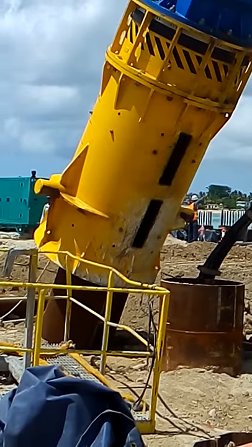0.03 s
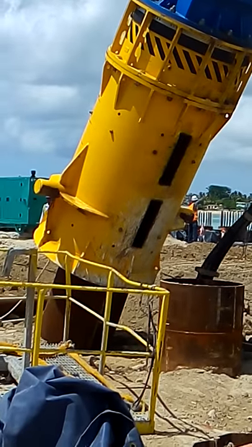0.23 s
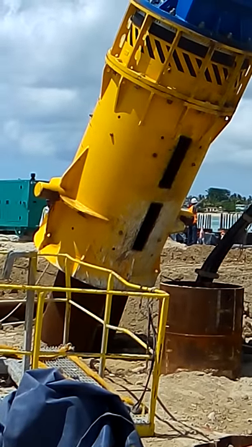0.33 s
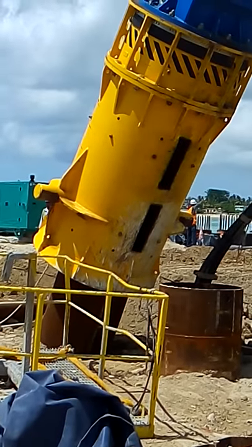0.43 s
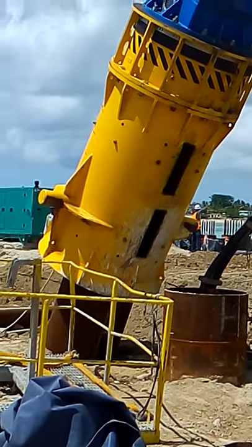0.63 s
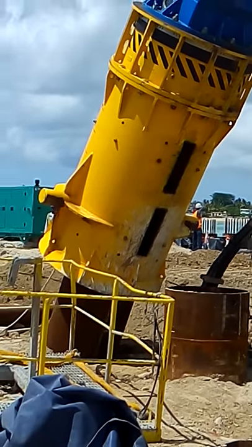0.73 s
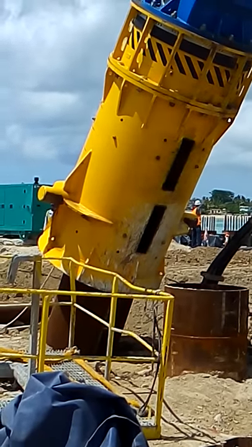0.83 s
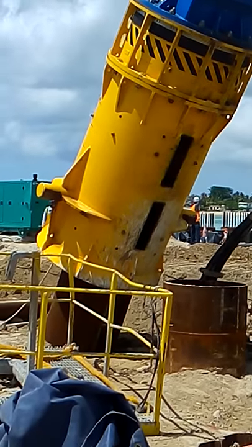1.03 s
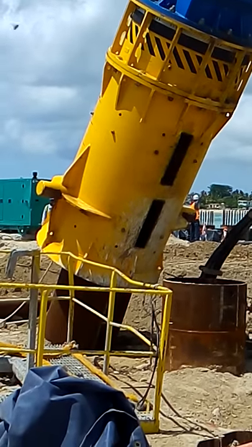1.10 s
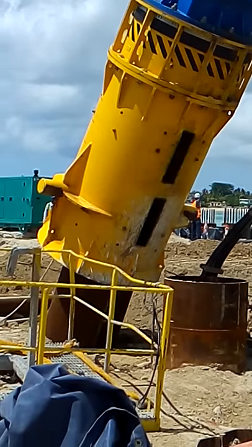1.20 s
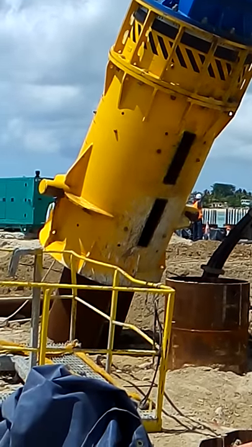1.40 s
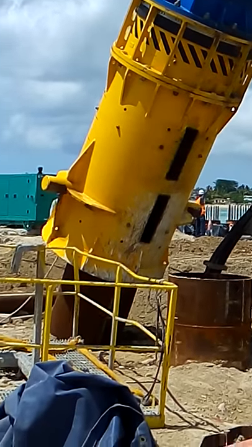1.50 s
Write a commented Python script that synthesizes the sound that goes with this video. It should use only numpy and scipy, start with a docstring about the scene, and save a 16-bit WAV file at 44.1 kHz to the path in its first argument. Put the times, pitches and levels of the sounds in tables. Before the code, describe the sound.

On an outdoor building site, faint machinery runs for a moment before a single loud pile driver blow hits a steel pile. The metal rattles, rings and dies away, treble first, while the hollow machine drone continues.

```python
"""A moment of faint machinery, then a crash: a hydraulic hammer strikes a large steel tube pile once. The
impact excites hammer and pile over a broad band, and the sleeve rattles against the pile. The tube rings, with
a shimmer and a low boom; the level lingers as if limited, then falls treble first. Behind it, on the open
building site, machinery runs, wind over a tube railing sounds a hollow drone that swells and sinks, and two
faint scrapes pass."""
import sys
import numpy as np
from scipy.fft import rfft, irfft, next_fast_len
from scipy.io import wavfile
from scipy.ndimage import map_coordinates

SR = 44100
rng = np.random.default_rng(int(sys.argv[2]) if len(sys.argv) > 2 else 0)


def wav_out(sig):
    """Save sig, one row per channel (or a flat mono array), as 16-bit PCM at SR to the path in sys.argv[1]."""
    wavfile.write(sys.argv[1], SR, np.round(np.clip(np.atleast_2d(sig).T, -1, 1) * 32767).astype(np.int16))


N = 68355
BLOW_S = 0.2132  # the ram lands

# spectral density of the impact: frequency_hz, relative_db
CRASH_SPECTRUM = [(30, -22), (75, -16.5), (115, -5.5), (185, -12), (250, 1), (337, -1), (520, -16.5),
                  (673, 0.5), (952, -3), (1070, -10), (1300, -12.5), (1860, -11.5), (2130, -19.5),
                  (2500, -8.5), (2750, -15.5), (3880, -18), (6440, -19.5), (7400, -18.5), (9000, -21.5)]
# attack by band: frequency_hz, rise_s
CRASH_ATTACK = [(100, .011), (300, 0.0031), (750, 0.019), (2500, 0.0031), (4000, .006), (7000, 0.024)]
# decay by band: frequency_hz, t60_s
CRASH_DECAY = [(60, 0.34), (250, 0.3), (800, 0.24), (2500, 0.27), (7000, 0.15)]
def crash():
    """Impact excitation: the ram's brief force shakes anvil, sleeve and pile over a broad band."""
    def shape(hz):
        return envelope(BLOW_S, rise=along(CRASH_ATTACK, hz), hold=0.028, t60=along(CRASH_DECAY, hz))
    return amp(-10) * by_band(noise(CRASH_SPECTRUM), shape)


# the pile's strongest modes: pitch_hz, level_db, early_t60_s
PILE_MODES = [(149, -31, 2.85), (229, -27, 1.44), (259, -24, 1.2), (305.7, -27.5, 1.9),
              (335.6, -22.5, 1.37), (442, -32, 1.17), (652, -29.5, 0.57), (693, -28.5, 0.66),
              (810, -23.5, 0.83), (877, -28.5, 1.3), (968, -22.5, 0.43), (1240, -26.5, 0.55),
              (2705, -43, 1.1), (3533, -35, 0.84)]
def pile_modes():
    """Modal vibration: ringing tones that beat as they fade, then die away faster."""
    beat_depth = 0.45
    age = np.maximum(clock() - BLOW_S, 0)
    out = np.zeros(N)
    for hz, db, t60 in PILE_MODES:
        phase = 2 * np.pi * (hz * age + rng.random())
        beating = wobble(17.04) * np.sin(phase) + wobble(17.28) * np.cos(phase)
        out += amp(db - 60 * age / t60) * (np.sin(phase) + beat_depth * beating)
    return out * envelope(BLOW_S, rise=0.011, hold=0.45, t60=.9)


# spectral density of the dense shell modes: frequency_hz, relative_db
WASH_SPECTRUM = [(30, -24.5), (75, -24.5), (110, -14), (151, -4.5), (190, -2.5), (300, -1.5), (420, -3),
                 (523, -7.5), (705, -3.5), (1020, -11.5), (1410, -9.5), (2040, -23), (2620, -17.5),
                 (3230, -19), (4300, -23), (5360, -21), (6590, -18), (8000, -21.5)]
# time until release by band: frequency_hz, hold_s
WASH_SUSTAIN = [(60, .3), (150, 0.34), (350, 0.18), (1200, 0.28), (3000, 0.25), (7000, .28)]
# release by band, on top of the steady sag: frequency_hz, t60_s
WASH_DECAY = [(60, 1.4), (150, 1.45), (350, 1.11), (1200, 0.78), (3000, 0.56), (7000, 0.52)]
def pile_wash():
    """Modal overlap: a dense metallic ring, held nearly level as if by a limiter, fades treble first."""
    def shape(hz):
        return envelope(BLOW_S, rise=0.056, hold=along(WASH_SUSTAIN, hz), t60=along(WASH_DECAY, hz))
    sag_db_per_s = 8.5
    gain = amp(-20.5 - sag_db_per_s * (clock() - BLOW_S))
    return gain * by_band(shell_comb(noise(WASH_SPECTRUM)), shape)


def shell_comb(x):
    """Resonant filtering: the tube's higher modes impose an irregular comb on x; rms 1."""
    spacing_hz, ripple_db, full_depth_hz = 20, 3.2, 2200
    peaks = rng.standard_normal(2048)
    def response(hz):
        comb = np.clip(map_coordinates(peaks, [hz / spacing_hz]), -2, 2)
        depth_db = ripple_db * np.minimum(hz / full_depth_hz, 1)
        return amp(depth_db * (comb - .4))
    return unit(filtered(x, response))


# bright ringing: pitch_hz, width_hz, relative_db
SHIMMER_LINES = [(2690, 36, -6.5), (3300, 130, -6), (5860, 28, -1), (6400, 36, -2.5), (6584, 20, 4),
                 (6830, 180, -8)]
def shimmer():
    """Narrow-band resonance: treble lines build up after the blow and fade quickly."""
    return amp(-31.6) * resonances(SHIMMER_LINES) * envelope(.31, rise=.11, hold=.14, t60=.19)


# the tube's low resonance: pitch_hz, width_hz, relative_db
BOOM_LINES = [(156.1, 20, 0)]
def boom():
    """Damped resonance: the tube's low boom blooms late and decays exponentially."""
    return amp(-36.5) * resonances(BOOM_LINES) * envelope(0.38, rise=0.027, hold=0.27, t60=0.72)


# contacts of sleeve and pile: start_s, level_db
SLEEVE_CONTACTS = [(.363, -32), (.435, -31.5), (.53, -40)]
# spectral density of a contact: frequency_hz, relative_db
RATTLE_SPECTRUM = [(300, -18), (1400, -15.5), (2100, -18), (3200, 10), (5000, -4), (7300, 6),
                   (12000, -25.5)]
def sleeve_rattles():
    """Contact noise: the sleeve knocks on the pile in bright bursts while the hammer settles."""
    bursts = sum(amp(db) * envelope(start, rise=.008, hold=0.017, t60=0.17)
                 for start, db in SLEEVE_CONTACTS)
    return noise(RATTLE_SPECTRUM) * bursts


# spectral density of the machinery: frequency_hz, relative_db
RUSH_SPECTRUM = [(30, -29), (70, -29.5), (110, -19), (177, -7), (260, -5.5), (380, -3.5), (523, -8.5),
                 (600, -7), (1090, -9.5), (1350, -11), (1860, -18.5), (2340, -14), (2800, -15.5),
                 (3200, -19.5), (3880, -22), (5480, -18.5), (6000, -23), (7400, -23), (9000, -29.5)]
# its slow drift: time_s, level_db
RUSH_LEVEL = [(0, -45), (.13, -45), (0.798, -45), (.92, -44), (1.1, -45), (1.261, -43), (1.55, -43.5)]
def machinery():
    """Broadband plus tonal noise: running machines give a slightly flickering rush and a faint hum."""
    rush_db = np.interp(clock(), *np.transpose(RUSH_LEVEL)) + 0.57 * wobble(35)
    rush = amp(rush_db) * noise(RUSH_SPECTRUM)
    hum_hz = 104.4
    hum = amp(-60) * np.sin(2 * np.pi * hum_hz * clock() + .3 * wobble(6))
    return rush + hum


# resonances of the drone: pitch_hz, width_hz, relative_db
DRONE_LINES = [(261, 61, -12), (320, 20, -0.5), (397, 44, -17), (589, 24, -15), (823, 36, -20),
               (1233, 16, -12)]
# its swells: peak_s, half_length_s, level_db
DRONE_PEAKS = [(0, 0.01, -33), (0.194, 0.033, -41.5), (0.87, 0.024, -46.5), (1.024, 0.039, -39.5),
               (1.258, 0.05, -38), (1.412, 0.068, -40), (1.512, 0.012, -40.5)]
def drone():
    """Amplitude modulation: wind over a tube railing sounds hollow resonances that swell above a quiet resting
    level."""
    swells = sum(amp(db) * swell(peak, half) for peak, half, db in DRONE_PEAKS)
    return (amp(-53) + swells) * resonances(DRONE_LINES)


# faint scrapes around the site: start_s, length_s, centre_hz, level_db
SITE_SCRAPES = [(0.875, 0.082, 680, -44), (1.117, 0.064, 2230, -50)]
def scrapes():
    """Friction noise: each distant rasp is a band of noise that rises and falls."""
    width_octaves = 0.39
    out = np.zeros(N)
    for start, length, centre, db in SITE_SCRAPES:
        band = lambda hz: np.exp(-(np.log2((hz + 1) / centre) / width_octaves) ** 2 / 2)
        rasp = unit(filtered(rng.standard_normal(N), band))
        out += amp(db) * rasp * swell(start + length / 2, length / 2)
    return out


def resonances(table):
    """Line broadening: each tone wanders in phase and strength as fast as it is wide; rms 1."""
    out = np.zeros(N)
    for hz, width, db in table:
        knots = rng.standard_normal((2, 1024))
        real, imag = (map_coordinates(k, [clock() * width * 1.5], mode="wrap") for k in knots)
        sway = (real + 1j * imag) / (real ** 2 + imag ** 2 + .1) ** .25  # evens out the strength
        line = np.real(sway * np.exp(2j * np.pi * hz * clock()))
        band = lambda f: 1 / (1 + ((f - hz) / (2 * width)) ** 4)
        out += amp(db) * np.sqrt(width) * filtered(line, band)
    return unit(out)


def noise(spectrum):
    """Spectral shaping: coloured noise of rms 1."""
    return unit(filtered(rng.standard_normal(N), lambda hz: amp(along(spectrum, hz))))


def by_band(x, shape, count=12):
    """Filter bank: each overlapping band of x gets the envelope shape(hz)."""
    centres = np.geomspace(50, 7500, count)
    return sum(shape(c) * filtered(x, lambda hz: along(np.c_[centres, centres == c], hz))
               for c in centres)


def filtered(x, response):
    """Linear filtering: the spectrum of x times response(hz)."""
    size = next_fast_len(N + SR // 2)
    return irfft(rfft(x, size) * response(np.fft.rfftfreq(size, 1 / SR)), size)[:N]


def envelope(start, rise, hold, t60):
    """Linear attack, then exponential decay from start + hold; all in seconds."""
    age = clock() - start
    return np.clip(age / rise, 0, 1) * amp(-60 * np.maximum(age - hold, 0) / t60)


def swell(centre, half):
    """A Gaussian bell in time."""
    return np.exp(-((clock() - centre) / half) ** 2)


def wobble(rate):
    """A smooth random curve, rate knots a second."""
    return map_coordinates(rng.standard_normal(256), [clock() * rate], mode="wrap")


def along(points, hz):
    """Interpolation of (frequency_hz, value) points on a log axis."""
    frequencies, values = np.transpose(points)
    return np.interp(np.log(hz + 1), np.log(frequencies + 1), values)


def amp(db):
    """Decibels to gain."""
    return 10 ** (np.asarray(db) / 20)


def unit(x):
    """Normalisation to rms 1."""
    return x / np.sqrt(np.mean(x ** 2) + 1e-20)


def clock():
    """Seconds at every sample."""
    return np.arange(N) / SR


def scene():
    """Superposition: one blow adds to the noise of the site, in mono."""
    blow = crash() + pile_modes() + pile_wash() + shimmer() + boom() + sleeve_rattles()
    site = machinery() + drone() + scrapes()
    return (blow + site)[None]


def record(dry):
    """Saturation and band limiting: the microphone rounds the highest peaks and cuts the top treble."""
    ceiling, knee_order = .85, 6
    cutoff_hz, filter_order = 7460, 75
    rounded = dry / (1 + np.abs(dry / ceiling) ** knee_order) ** (1 / knee_order)
    lowpass = lambda hz: 1 / np.sqrt(1 + (hz / cutoff_hz) ** (2 * filter_order))
    return np.array([filtered(channel, lowpass) for channel in rounded])


dry = scene()
out = record(dry)
wav_out(out)
```